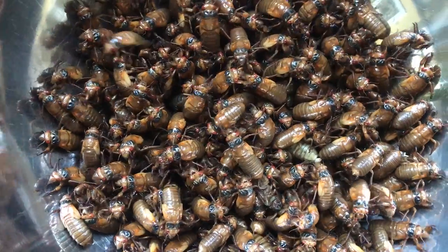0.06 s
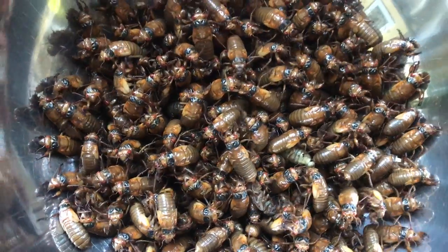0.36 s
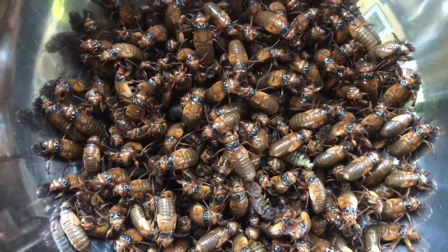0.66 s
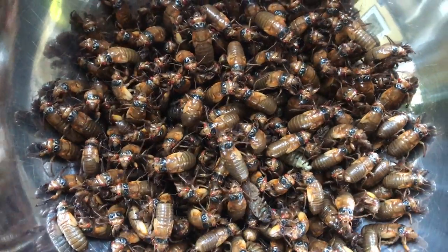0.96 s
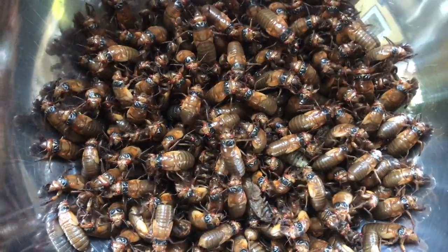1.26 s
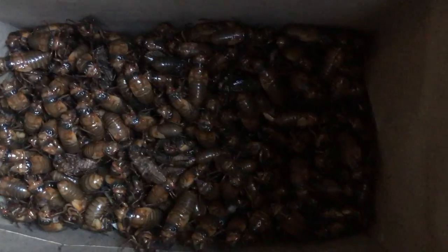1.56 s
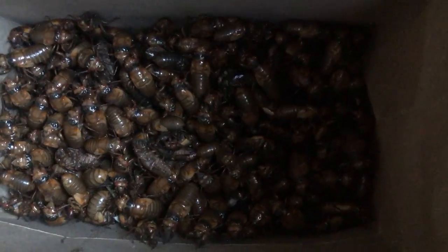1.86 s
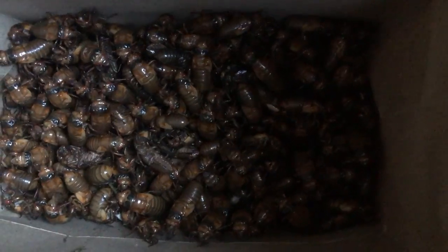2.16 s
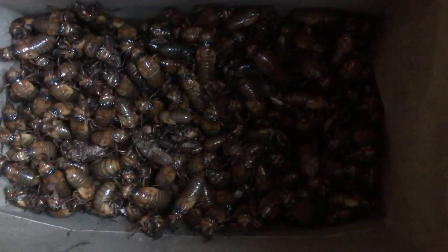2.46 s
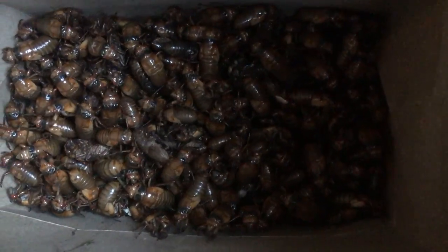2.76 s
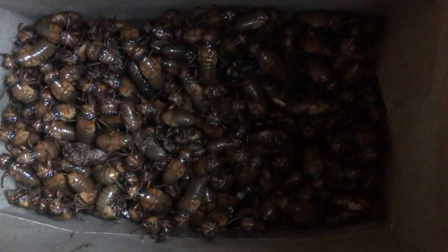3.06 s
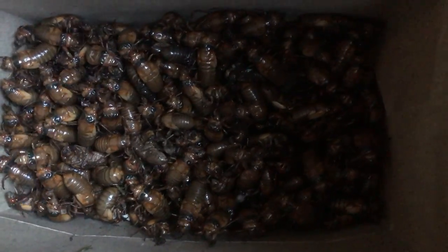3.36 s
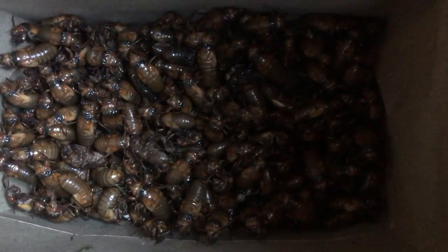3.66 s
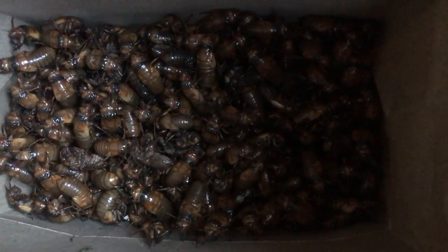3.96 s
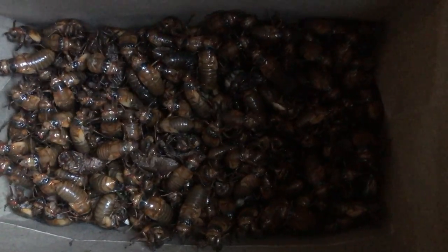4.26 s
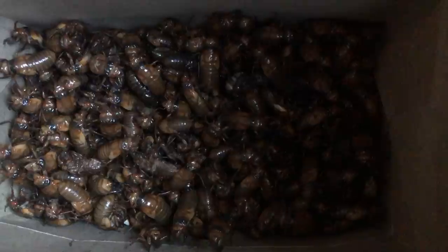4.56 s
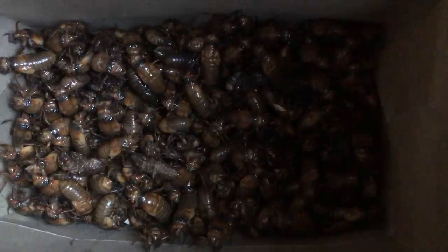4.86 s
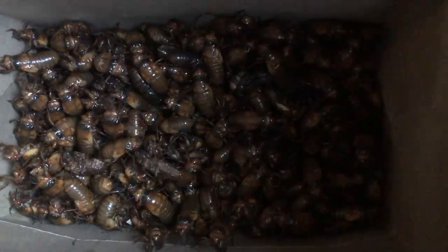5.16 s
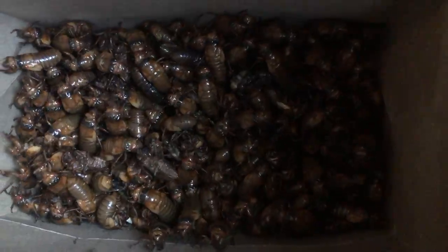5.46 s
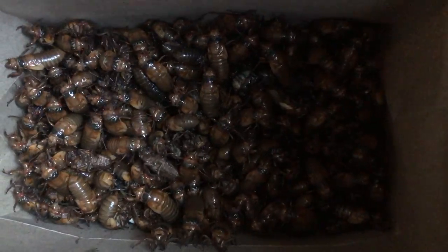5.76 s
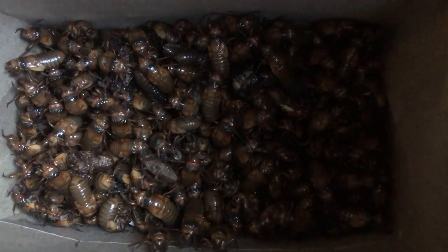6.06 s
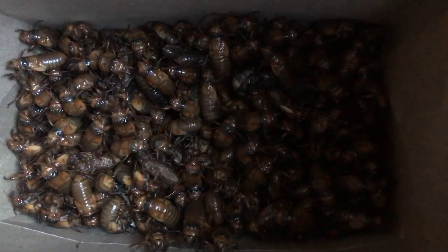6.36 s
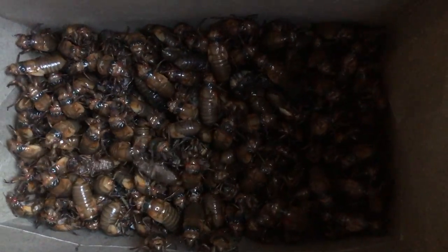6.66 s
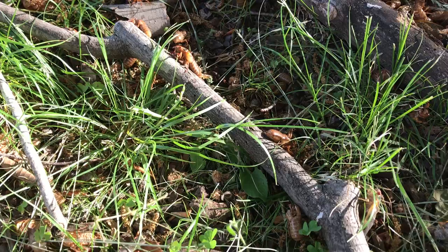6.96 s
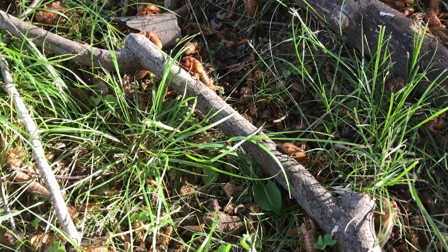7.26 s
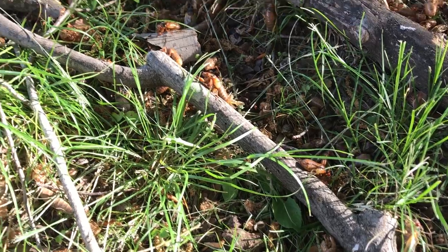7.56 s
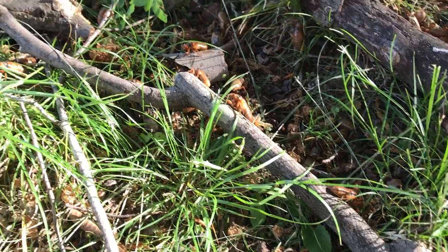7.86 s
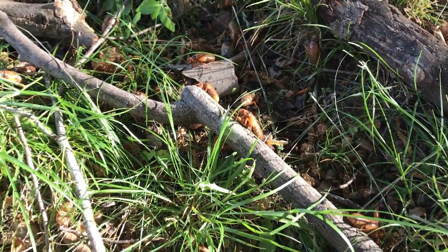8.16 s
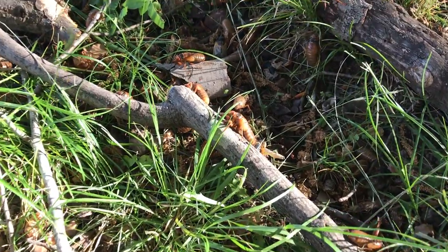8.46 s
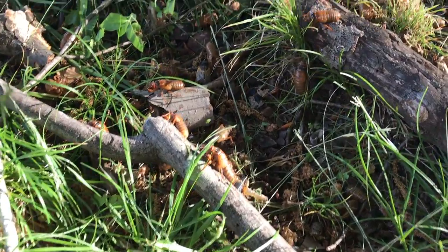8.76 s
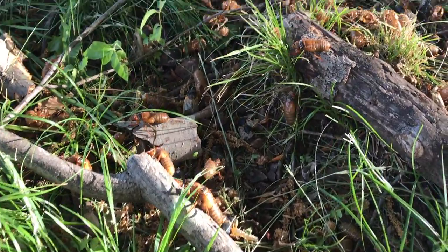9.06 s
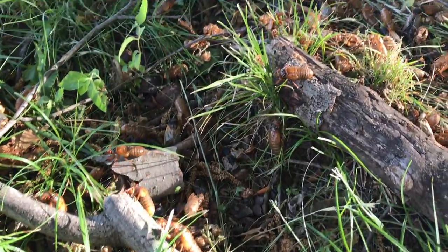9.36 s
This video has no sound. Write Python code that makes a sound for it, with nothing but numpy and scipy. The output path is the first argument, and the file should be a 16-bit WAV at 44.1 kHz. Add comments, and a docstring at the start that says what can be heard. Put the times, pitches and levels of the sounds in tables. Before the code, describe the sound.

For the first second and a half, a heap of cicada nymphs crawls in a metal bowl. Their claws make very faint, high scratches and a few tiny clicks, and short skids around 1 second make the metal ring softly. The sound drops out for an instant just before 1.5 seconds.

Then the insects are crawling in a paper-walled box, clearly louder and close. Hundreds of claws make a dense, dry crackling rustle that swells and settles unevenly until about 9.5 seconds. Crisp shell ticks and snaps stand out throughout, the sharpest near 3, 4.1, 5.1 and 8.1 seconds, mixed with brief scrapes. Small hollow knocks sound as claws snag the wall, notably near 2.6 and 3.7 seconds, in a cluster around 4.5, and more often from 7 to 8.7 seconds. A soft, low room rumble and hum lie under both parts.

```python
"""Faint scratches on metal: a heap of cicada nymphs crawls in a bowl, which rings softly under their claws.
After a short silence the heap crawls in a paper-walled box. Hundreds of claws catch and slip each second:
shells tick and snap, the paper crackles, and harder snags knock hollowly on the wall.
A low room rumble and hum lie under both scenes."""
import sys
import numpy as np
from scipy import signal
from scipy.fft import rfft, irfft
from scipy.io import wavfile
from scipy.ndimage import uniform_filter1d

SR = 44100
rng = np.random.default_rng(int(sys.argv[2]) if len(sys.argv) > 2 else 0)


def unload_audio(sound):
    """Save the sound as a 16-bit wav file, at the path given as the first command line argument."""
    columns = np.transpose(np.atleast_2d(sound))
    # keep every value between -1 and 1, then stretch to whole-number steps
    steps = np.round(np.clip(columns, -1, 1) * 32767)
    wavfile.write(sys.argv[1], SR, steps.astype(np.int16))


N = 419391

TOP_HZ, SHELL_Q = 15800, 28
# a click's crack dies at once, its scatter off the walls soon after
SCATTER = dict(t60=.009, tail_db=-12, tail_t60=.032)
# modes of the plucked box wall: pitch_hz, level_db, t60_s
WALL_MODES = [(905, -6, 0.093), (950, -2, 0.049), (1087, 5.5, 0.01), (1323, 7.5, 0.013), (1620, 6.5, 0.017),
              (1940, -3, 0.027)]
WALL_HZ = WALL_MODES[0][0]


def heap_in_box():
    """Shells tick against each other while the claws at the edge of the heap drum on the paper."""
    # the heap stirs and settles: time_s, paper_db, shell_db
    heap_stir = [(1.5, -55.5, -50), (1.62, -58, -51), (1.8, -56.5, -57), (1.97, -55.5, -52),
                 (2.14, -54, -50), (2.31, -55, -51.5), (2.5, -52, -47.5), (2.65, -51, -48.5),
                 (2.8, -58.5, -52.5), (2.95, -56, -56.5), (3.3, -50, -50.5), (3.55, -53, -52.5),
                 (3.74, -49.5, -50.5), (4.08, -57, -53.5), (4.3, -50, -50), (4.6, -48, -54),
                 (4.92, -54, -51), (5.02, -52, -47), (5.28, -46.5, -55.5), (5.38, -55.5, -51),
                 (5.7, -53.5, -53.5), (6.55, -56, -53.5), (6.75, -51, -50), (6.85, -54.5, -51),
                 (7.0, -50.5, -54.5), (7.12, -48.5, -47), (7.52, -49, -49), (7.62, -52, -52.5),
                 (7.8, -53.5, -52), (8.0, -50.5, -49), (8.2, -55.5, -49.5), (8.35, -49.5, -54.5),
                 (8.62, -53.5, -52.5), (8.78, -47, -49), (8.9, -54, -56), (9.2, -48.5, -55),
                 (9.5, -52, -51)]
    # a nymph slides over its neighbours and scrapes the wall: start_s, length_s, paper_db, shell_db
    box_skids = [(2.414, 0.1, -53, -51), (2.995, 0.087, -48, -49), (3.167, 0.059, -48, -49.5),
                 (4.51, 0.11, -48, -57), (5.552, 0.052, -50.5, -56), (6.013, 0.043, -49, -63),
                 (6.118, 0.12, -50.5, -57), (6.428, 0.044, -61, -50), (7.297, 0.046, -48, -56),
                 (7.41, 0.072, -52.5, -47), (7.924, .05, -52, -51), (8.204, 0.068, -50, -48.5),
                 (8.442, 0.052, -47, -46.5), (8.946, 0.082, -49.5, -47.5), (9.079, 0.022, -47.5, -44.5),
                 (9.136, .12, -59, -46.5)]
    # tone of the paper: frequency_hz, gain_db
    paper_colour = [(300, -24), (540, -22.5), (720, -5.5), (890, 1), (1050, -3.5), (1350, -1.5),
                    (1650, -4.5), (2050, -4.5), (2500, -14), (4000, -5), (9000, -42)]
    # tone of the shells: frequency_hz, gain_db
    shell_colour = [(1200, 3), (2400, -4.5), (3300, -4), (4000, -7.5), (4550, -3.5), (4950, -8), (5600, -2),
                    (7000, -4), (7700, -7), (9300, -4), (10400, -12.5), (11200, -7), (15800, -5.5)]
    flurries_per_s, flurry_db = 14, 1.1  # single nymphs struggle in short flurries
    paper_db, shell_db = curve(heap_stir)
    start_s, length_s, skid_paper_db, skid_shell_db = np.transpose(box_skids)
    paper_db = skid_level(zip(start_s, length_s, skid_paper_db), paper_db + flurry_db * walk(flurries_per_s))
    shell_db = skid_level(zip(start_s, length_s, skid_shell_db), shell_db + flurry_db * walk(flurries_per_s))
    times, sizes = claw_steps(per_s=200, step_db=2.8, slip_db=1.8, slip_s=.005, uneven=2, ease_db=4)
    paper = crackle(times, sizes, lo_hz=815, hi_hz=2175, hold_s=.15,
                    q=16.7, upper_db=1.5, crack_db=2.5, **SCATTER)
    times, sizes = claw_steps(per_s=190, step_db=3, slip_db=2.2, slip_s=.0025, uneven=2.5, ease_db=3,
                              catches=4)
    shell = crackle(times, sizes, lo_hz=2375, hi_hz=13870, hold_s=.1,
                    q=SHELL_Q, upper_db=.5, crack_db=1, crack_q=1.1, **SCATTER)
    paper = ride(colour(paper, paper_colour), paper_db)
    shell = ride(colour(shell, shell_colour), shell_db)
    return paper + shell + light_snaps(shell_db)


def shell_snaps():
    """A hooked claw lets go of a shell: the shell rings, the claw ticks and the wall is jolted."""
    # claws snapping off shells: start_s, ring_peak_db, ring_hz, tick_hz, tick_db
    snaps = [(1.485, -33, 6000, 8700, -45), (1.777, -45, 6290, 8600, -38), (1.8348, -32, 1970, 4700, -45),
             (2.0348, -39, 2300, 7400, -41.5), (2.2654, -40, 5230, 7100, -36),
             (2.4505, -35, 3200, 12660, -43), (2.523, -34, 4300, 7400, -47),
             (2.6192, -37, 5800, 7570, -38.5), (2.643, -36, 5800, 11300, -45),
             (2.671, -38, 6030, 14000, -41), (2.833, -42, 2980, 7300, -40),
             (2.8606, -31, 3080, 9100, -35.5), (2.9652, -25, 5730, 11300, -51),
             (2.989, -33, 3200, 8060, -38.5), (3.3585, -28.5, 3460, 9230, -40),
             (3.3905, -33, 4450, 8220, -56), (3.4276, -36, 6040, 9500, -49), (3.4397, -48, 1980, 9400, -39),
             (3.464, -39, 3170, 6740, -48), (3.506, -39, 2150, 14500, -41), (3.608, -33, 3210, 7170, -43),
             (3.615, -35, 3700, 14500, -46), (3.638, -33, 3880, 6200, -50), (3.807, -41, 3770, 10600, -32),
             (4.006, -30.5, 3320, 5970, -36.5), (4.062, -33, 2000, 6950, -55),
             (4.1339, -23, 3100, 12100, -42), (4.238, -33, 3460, 14600, -36),
             (4.4632, -29.5, 3600, 7270, -31.5), (4.551, -50, 1970, 8900, -36),
             (4.8628, -29.5, 4130, 6300, -52), (4.8713, -34, 4560, 8350, -49),
             (4.9514, -44, 6200, 12000, -44), (4.9675, -30, 4120, 7010, -58), (5.092, -32, 5740, 9100, -37),
             (5.1447, -23, 2500, 9300, -32.5), (5.1969, -26, 2570, 9500, -35.5),
             (5.2385, -35, 3130, 11600, -38), (5.2507, -29, 3480, 7350, -43),
             (5.287, -33.5, 3080, 8200, -43), (5.521, -51, 2150, 11700, -39), (5.537, -39, 5310, 9000, -39),
             (5.559, -36, 5340, 8160, -38), (5.693, -46, 5390, 8200, -41), (5.794, -28, 3500, 11100, -46),
             (5.8134, -46, 4280, 12200, -42), (5.9482, -35, 4500, 13300, -40),
             (6.032, -33, 5060, 11700, -42), (6.1905, -38, 4400, 6890, -40), (6.34, -36, 4530, 7700, -42),
             (6.368, -39.5, 2000, 9040, -38), (6.4416, -35, 2350, 10300, -40.5),
             (6.662, -33, 2410, 6200, -47), (6.744, -29.5, 4440, 6870, -41), (6.7704, -39, 4500, 6940, -38),
             (6.786, -29, 3560, 6540, -42), (7.0, -29.5, 5290, 7900, -57), (7.0654, -33.5, 4300, 7330, -44),
             (7.074, -38, 4130, 7230, -45), (7.133, -41, 3930, 9200, -33.5), (7.1624, -35, 3500, 7200, -41),
             (7.1827, -29, 3450, 8100, -54), (7.2248, -33, 3530, 7300, -45), (7.253, -34, 4300, 6440, -50),
             (7.2762, -31, 4420, 7100, -49), (7.308, -30, 2180, 6200, -46), (7.3226, -32, 2000, 7140, -46),
             (7.397, -38, 4230, 7160, -52), (7.4255, -29, 5430, 7900, -48), (7.4363, -31, 2940, 6840, -38),
             (7.523, -30, 5900, 6400, -42), (7.719, -31, 3530, 8440, -50), (7.819, -31, 3870, 7000, -37),
             (7.9253, -34, 3530, 7150, -41), (8.144, -22, 1910, 9200, -38),
             (8.2465, -39, 5580, 9150, -34.5), (8.2635, -42, 5510, 8350, -37),
             (8.482, -38, 2250, 6800, -51), (9.0196, -41, 1980, 8960, -40.5),
             (9.131, -29.5, 2450, 8500, -49), (9.1442, -29.5, 4670, 7200, -32.5)]
    # modes of a shell: pitch_ratio, level_db
    shell_modes = [(1, -2.5), (1.22, -4), (1.84, -6.5)]
    start_s, peak_db, ring_hz, tick_hz, tick_db = np.transpose(snaps)
    # above 3200 Hz the ring gets purer: its upper modes lose 25 dB per octave
    upper_loss_db = 25 * np.maximum(np.log2(ring_hz / 3200), 0)[:, None]
    shell = 0
    for ratio, db in shell_modes:
        mode = clicks(ring_hz * ratio, q=16, upper_db=-20, crack_db=-2, crack_q=2.6, order=2, **SCATTER)
        shell = shell + mode * undb(db - upper_loss_db * (ratio > 1))
    shell = shell / np.abs(shell).max(axis=1, keepdims=True) * undb(peak_db)[:, None]
    tick = clicks(tick_hz, q=20, upper_db=-6, crack_db=1, crack_q=2.5, **SCATTER)
    tick = punch(low_cut(tick, hz=4640), tick_db)
    jolt = wall_ring(peak_db - 20, np.full(len(snaps), WALL_HZ), tilt_db=np.zeros(len(snaps)))
    return place(start_s, shell + tick + jolt)


def light_snaps(shell_db, per_s=13, lo_hz=3160, hi_hz=13900):
    """Crisp, pitched ticks stand out of the rustle at chance moments, louder when the shells rub harder."""
    when, pitch, force = rng.random((int(per_s * N / SR), 3)).T
    start_s = when * N / SR
    hz = lo_hz * (hi_hz / lo_hz) ** pitch
    level_db = shell_db[(start_s * SR).astype(int)] + 3.5 + force  # about 4 dB above the rubbing
    ticks = clicks(hz, q=SHELL_Q, upper_db=-7, crack_db=0, crack_q=3, **SCATTER)
    return place(start_s, punch(ticks, level_db))


def wall_knocks():
    """A claw plucks the wall: it knocks hollowly and the paper cracks."""
    # hard snags on the wall: start_s, knock_db, pitch_hz, tilt_db_per_octave, crack_db
    knocks = [(2.5844, -30, 920, -8, -40), (2.601, -37, 907, -21, -51), (3.149, -38.5, 925, 1, -43),
              (3.2126, -37.5, 900, 25, -48), (3.4645, -38, 900, 14, -48), (3.6902, -30.5, 920, 8, -39),
              (4.314, -36.5, 937, 7, -50), (4.412, -37.5, 930, -5, -45), (4.493, -39.5, 1000, 0, -42),
              (4.529, -41, 970, -16, -48), (4.646, -40.5, 900, 3, -46), (5.1966, -39, 896, -16, -42),
              (5.5839, -37, 890, -19, -44), (5.6681, -41, 890, -34, -65), (6.3404, -38, 845, -20, -44),
              (6.9146, -38, 906, -9, -42), (7.2526, -39, 900, 6, -52), (7.3337, -35, 880, -18, -42),
              (7.516, -40, 930, 22, -39), (7.8655, -37, 860, 3, -44), (7.878, -37, 895, 6, -43),
              (7.965, -36, 915, -9, -45), (8.1437, -33, 860, -21, -32.5), (8.192, -41, 904, -16, -54),
              (8.2092, -38, 920, 0, -40), (8.238, -34.5, 942, -5, -51), (8.3984, -31, 890, -8, -45),
              (8.6832, -35.5, 890, -31, -38.5)]
    start_s, knock_db, pitch_hz, tilt_db, crack_db = np.transpose(knocks)
    crack_hz = 2500 * np.exp(.06 * rng.standard_normal(len(knocks)))
    crack = low_cut(clicks(crack_hz, q=7.7, upper_db=-3, crack_db=3, **SCATTER), hz=1660)
    return place(start_s, wall_ring(knock_db, pitch_hz, tilt_db) + punch(crack, crack_db))


def wall_ring(level_db, pitch_hz, tilt_db):
    """One row per blow on the wall: the spot sets the pitch, a harder claw brings out higher modes."""
    blows = []
    for pitch, tilt in zip(pitch_hz, tilt_db):
        modes = [(hz * pitch / WALL_HZ, db + tilt * np.log2(hz / WALL_HZ), t60)
                 for hz, db, t60 in WALL_MODES]
        blows.append(low_cut(ring(modes, jitter=.01, size=2048), hz=.86 * pitch, order=6))
    return punch(np.array(blows), level_db)


def heap_in_bowl(end_s):
    """Claws judder over the metal: the bowl rings faintly, and each skid makes one mode sing out."""
    # tone of the scratches: frequency_hz, gain_db
    bowl_colour = [(1000, -25), (2300, -29), (4900, -27), (5500, 7.5), (6200, 6.5), (7700, -6), (9300, -5),
                   (10400, -15), (11700, -4), (15800, -9)]
    # the bowl's ring, damped by the heap: pitch_hz, level_db, t60_s
    bowl_modes = [(2280, 5, 0.032), (5700, 8, 0.085), (6000, 7, 0.13), (6330, 7, 0.1), (6920, 4, 0.06),
                  (7500, 1, .05), (8400, 4, 0.04), (8700, 0, 0.04), (9340, 5, 0.043)]
    # claws skidding down the side: start_s, length_s, level_db, sing_hz, sing_db
    bowl_skids = [(0.01, 0.21, -72, 2280, -77), (0.096, .1, -67, 5720, -73),
                  (0.918, 0.16, -61.5, 6230, -68), (1.152, 0.067, -62.5, 5870, -70),
                  (1.254, 0.066, -62, 5950, -71), (1.36, 0.033, -64, 6200, -71)]
    # single clicks in the bowl: start_s, level_db, pitch_hz
    bowl_clicks = [(0.16, -55, 6400), (0.1835, -54, 6230), (0.351, -54, 1530), (0.542, -55, 2640),
                   (0.664, -59.5, 4330), (0.716, -59, 4440), (0.782, -57, 2840), (1.04, -57, 3770),
                   (1.382, -50, 7160)]
    times, sizes = claw_steps(per_s=42, step_db=1, slip_db=3, slip_s=.0015, uneven=.35, ease_db=.5,
                              catches=8)
    early = times[:, 0] < end_s
    scratch = crackle(times[early], sizes[early], lo_hz=4000, hi_hz=9500, hold_s=.03,
                      q=8, upper_db=0, crack_db=8, t60=.003, tail_db=-15, tail_t60=.018)
    metal = signal.oaconvolve(scratch, ring(bowl_modes))[:N]
    scrape = unit(colour(scratch, bowl_colour)) + undb(-3.5) * unit(metal)
    scrape = ride(scrape, skid_level([row[:3] for row in bowl_skids], rest_db=-72.5))
    sing_t60_s = .06
    for start_s, length_s, _, sing_hz, sing_db in bowl_skids:
        singing = signal.oaconvolve(scratch, ring([(sing_hz, 0, sing_t60_s)]))[:N]
        scrape += ride(singing, skid_level([(start_s, length_s, sing_db)], rest_db=-np.inf))
    tap_s, tap_db, tap_hz = np.transpose(bowl_clicks)
    taps = clicks(tap_hz, q=10, upper_db=-8, crack_db=-1, t60=.007, tail_db=-7, tail_t60=.05)
    return scrape + place(tap_s, punch(taps, tap_db))


def claw_steps(per_s, step_db, slip_db, slip_s, uneven, ease_db, catches=2):
    """Contact times and gains, one row per step: a claw catches, slips and catches again, easing off."""
    draw = rng.random((int(per_s * N / SR), 2 + 2 * catches))
    start_s = (np.arange(len(draw)) + uneven * draw[:, 0]) / per_s
    times = start_s[:, None] - slip_s * np.cumsum(np.log(draw[:, 1:1 + catches]), axis=1)
    force = np.minimum(-np.log(draw[:, 1 + catches:]), 3.2)  # many light touches, few hard ones
    return times, undb(step_db * force[:, :1] + slip_db * force[:, 1:] - ease_db * np.arange(catches))


def crackle(times, sizes, lo_hz, hi_hz, hold_s, claws=7, **click):
    """A few claws are busy at a time; each keeps its spot, and so its pitch, for about hold_s."""
    spots = rng.random((claws, 1024))
    claw = rng.integers(0, claws, 4000)[:len(times)]
    turn = (times[:, 0] / hold_s + claw / claws).astype(int)
    spot = spots[claw, turn % spots.shape[1]]
    wobble = rng.uniform(.97, 1.03, (4000, times.shape[1]))[:len(times)]
    hz = (lo_hz * (hi_hz / lo_hz) ** spot[:, None] * wobble).ravel()
    gain = sizes.ravel() / hz ** .12
    return place(times.ravel(), gain[:, None] * clicks(hz, size=1024, **click))


def skid_level(skids, rest_db, attack_s=.0024, release_s=.021, sag_db_per_s=3):
    """Level in dB of scratching: each skid rises quickly out of rest_db, loses force and lets go."""
    t = np.arange(N) / SR
    power = undb(rest_db) ** 2
    for start_s, length_s, db in skids:
        age = np.maximum(t - start_s, 0)
        gate = np.minimum(age / attack_s, 1) * np.exp(-np.maximum(age - length_s, 0) / release_s)
        power = power + (gate * undb(db - sag_db_per_s * age)) ** 2
    return 10 * np.log10(power)


def clicks(hz, q, upper_db, crack_db, t60, tail_db, tail_t60, crack_q=.55, order=1, size=2048):
    """One row per click: a short three-mode ring and a crack around hz that scatters off the walls."""
    hz = np.asarray(hz)[:, None]
    f = (np.arange(size // 2 + 1) + 1e-6) * SR / size
    t = np.arange(size) / SR
    rise = 1 - fade(.0015, size)
    # a stiff, irregular shell: the upper modes lie at uneven ratios
    ratios = np.cumprod(1.15 + .6 * rng.random((len(hz), 2)), axis=1)
    tone = 0
    for mode_hz, db in (hz, 0), (hz * ratios[:, :1], upper_db), (hz * ratios[:, 1:], upper_db):
        decay = np.exp(-np.pi * np.sqrt(hz * mode_hz) * t / q)
        tone = tone + undb(db) * (mode_hz < TOP_HZ) * np.sin(2 * np.pi * mode_hz * t) * decay
    envelope = rise * (fade(t60, size) + undb(tail_db) * fade(tail_t60, size))
    burst = rng.standard_normal((len(hz), size)) * envelope
    crack = irfft(rfft(burst) / (1 + 1j * crack_q * (f / hz - hz / f)) ** order)  # band-pass at hz
    return punch(tone * rise) + punch(crack, crack_db)


def ring(modes, jitter=0, size=4096):
    """Decaying modes; jitter is their slight detuning by the load on them."""
    t = np.arange(size) / SR
    out = 0
    for hz, db, t60 in modes:
        detuned_hz = hz * (1 + jitter * rng.standard_normal())
        out = out + undb(db) * fade(t60, size) * np.sin(2 * np.pi * detuned_hz * t)
    return out


def room_tone(tone, rumble_db, hum_db, hum_hz=96.2):
    """Low rumble with a slightly wavering hum."""
    rumble = unit(colour(rng.standard_normal(N), tone)) * undb(rumble_db + .7 * walk(6))
    hum = np.sin(2 * np.pi * np.cumsum(hum_hz * (1 + .0066 * walk(9))) / SR)
    return low_cut(rumble, hz=34.7) + hum * undb(hum_db + 1.5 * walk(4.1))


def undb(db):
    """Decibels to gain."""
    return 10 ** (np.asarray(db) / 20)


def unit(x):
    """Scale to rms 1."""
    return x / np.sqrt(np.mean(x ** 2) + 1e-20)


def punch(x, db=0):
    """Set the loudest two milliseconds of each row to the rms level db."""
    power = uniform_filter1d(x ** 2, 88, axis=-1, mode="constant")
    return x / np.sqrt(power.max(axis=-1, keepdims=True)) * undb(db)[..., None]


def ride(x, db):
    """Ride the fader so that a texture follows the running level db."""
    power = np.abs(uniform_filter1d(x ** 2, 6000))
    return x * undb(db) / np.sqrt(power + 1e-4 * np.mean(x ** 2))


def curve(table):
    """Per-sample curves through rows that begin with a time in seconds."""
    time_s, *columns = np.transpose(table)
    return [np.interp(np.arange(N) / SR, time_s, column) for column in columns]


def walk(per_s):
    """Random drift with a spread near 1."""
    knots = rng.standard_normal(4096)
    return np.interp(np.arange(N) / SR * per_s, np.arange(len(knots)), knots)


def fade(t60, size):
    """Exponential decay that loses 60 dB in t60 seconds."""
    return np.exp(-np.log(1000) * np.arange(size) / SR / t60)


def colour(x, points, size=8192):
    """Minimum-phase EQ through points of frequency_hz, gain_db."""
    hz, db = np.transpose(points)
    bin_hz = np.arange(size // 2 + 1) * SR / size
    log_gain = np.log(undb(np.interp(np.log(bin_hz + 1), np.log(hz), db)))
    cepstrum = irfft(log_gain)[:size // 2]
    cepstrum[1:] *= 2
    return signal.oaconvolve(x, irfft(np.exp(rfft(cepstrum, size))))[:len(x)]


def low_cut(x, hz, order=4):
    """Roll off the bass below hz."""
    return signal.sosfilt(signal.butter(order, hz, "highpass", fs=SR, output="sos"), x)


def place(times, sounds):
    """Lay sounds on the timeline."""
    out = np.zeros(2 * N)
    for start_s, sound in zip(times, sounds):
        i = max(int(start_s * SR), 0)
        out[i:i + len(sound)] += sound
    return out[:N]


def scene():
    """The bowl, a short silence, then the box, each over its own room tone."""
    # rumble around the bowl: frequency_hz, gain_db
    bowl_room = [(22, -22), (45, 2.5), (85, -7.5), (110, -0.5), (130, -21), (165, -6), (192, -14),
                 (232, -0.5), (290, -9), (420, -12.5), (520, -20.5), (1000, -21), (2000, -28.5),
                 (15800, -34)]
    # rumble around the box: frequency_hz, gain_db
    box_room = [(22, -15.5), (48, 2.5), (75, -3.5), (108, -3), (130, -10.5), (160, -2.5), (192, -13),
                (230, -1.5), (270, -2), (325, -8), (380, -15), (600, -14), (2000, -15.5), (15800, -27)]
    # slow swell of the rumble around the box: time_s, level_db
    room_swell = [(1.5, -53.5), (3.8, -53.5), (5.7, -51.5), (6.8, -53), (9.5, -52.5)]
    bowl_end_s, box_start_s = 1.445, 1.483
    t = np.arange(N) / SR
    swell_db, = curve(room_swell)
    in_bowl = heap_in_bowl(bowl_end_s) + room_tone(bowl_room, rumble_db=-59, hum_db=-64.5)
    in_box = heap_in_box() + wall_knocks() + shell_snaps()
    in_box += room_tone(box_room, rumble_db=swell_db, hum_db=-66.5)
    return (in_bowl * (t < bowl_end_s) + in_box * (t > box_start_s))[None]


def record(dry):
    """A steep low-pass cuts the top treble."""
    return signal.sosfilt(signal.ellip(10, .2, 70, TOP_HZ, fs=SR, output="sos"), dry)


dry = scene()
out = record(dry)
unload_audio(out)
```